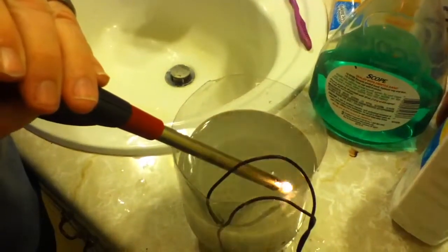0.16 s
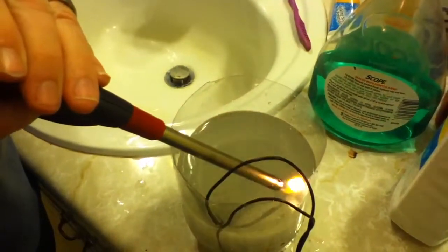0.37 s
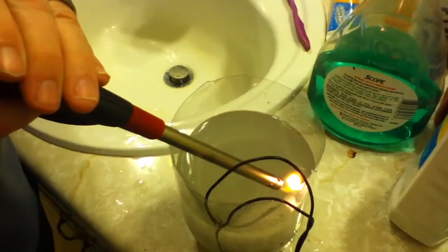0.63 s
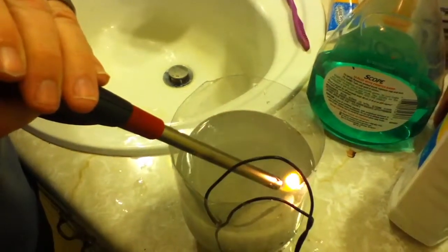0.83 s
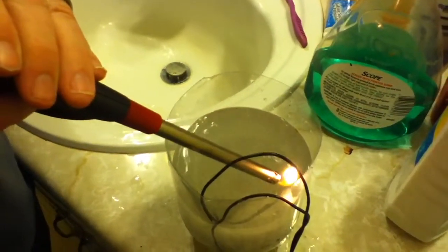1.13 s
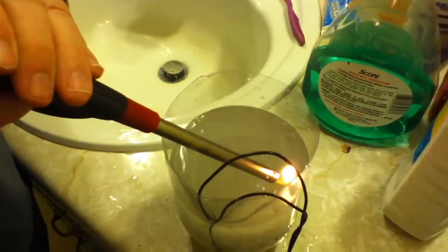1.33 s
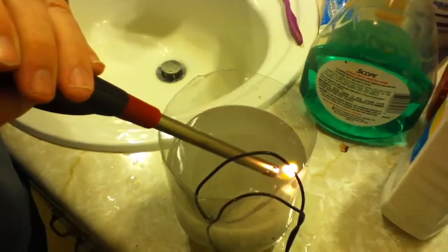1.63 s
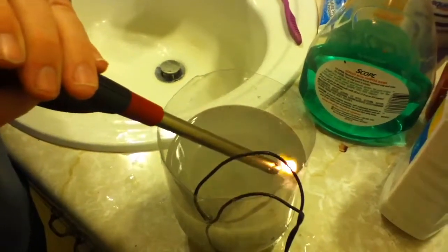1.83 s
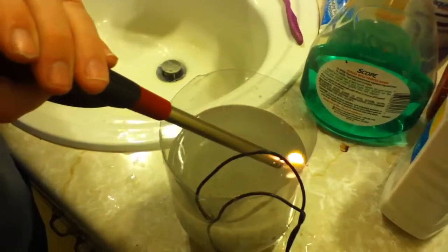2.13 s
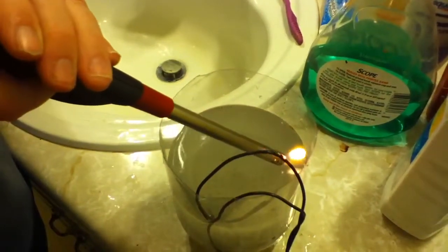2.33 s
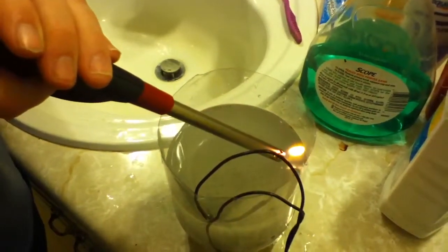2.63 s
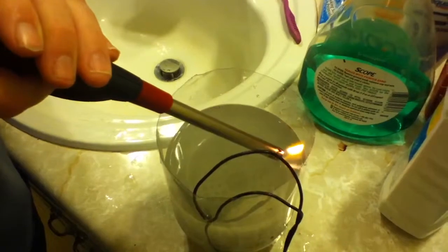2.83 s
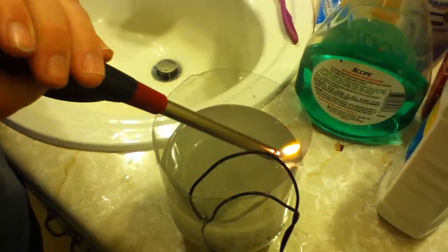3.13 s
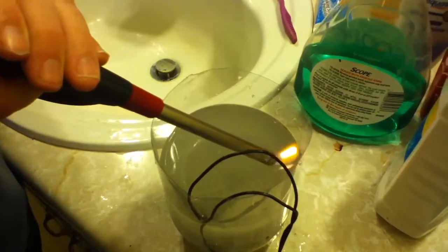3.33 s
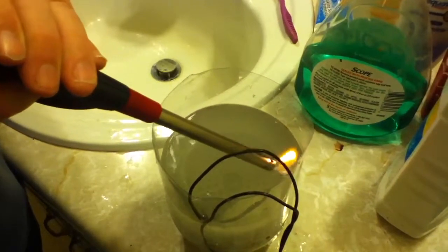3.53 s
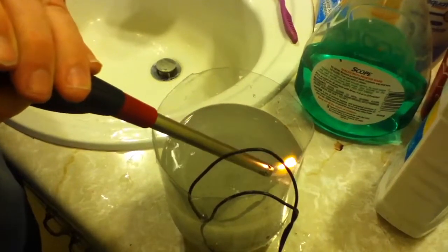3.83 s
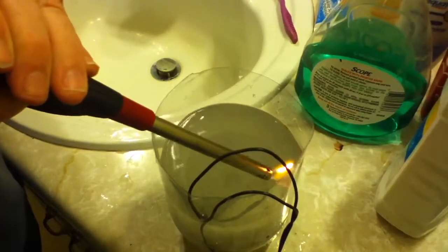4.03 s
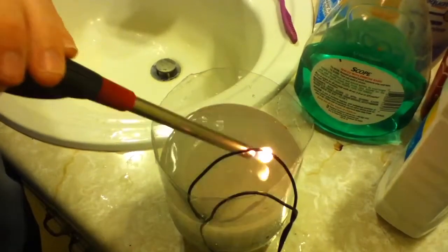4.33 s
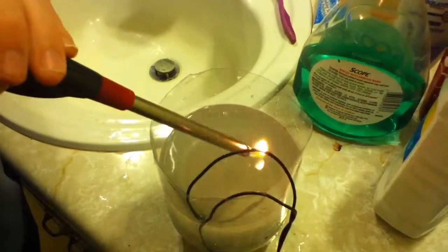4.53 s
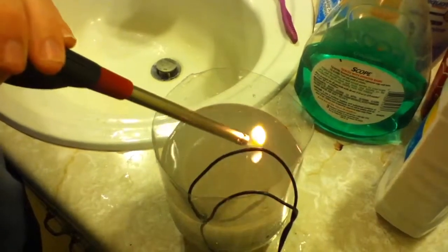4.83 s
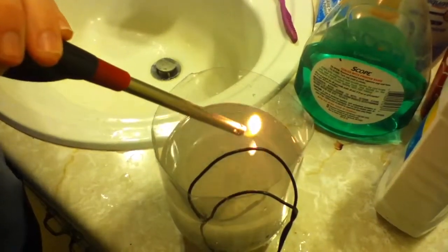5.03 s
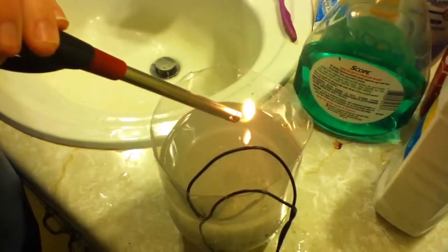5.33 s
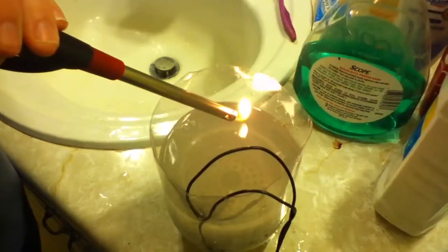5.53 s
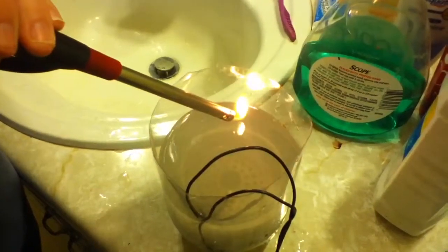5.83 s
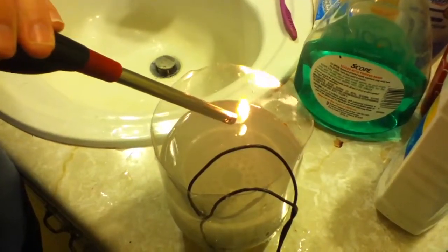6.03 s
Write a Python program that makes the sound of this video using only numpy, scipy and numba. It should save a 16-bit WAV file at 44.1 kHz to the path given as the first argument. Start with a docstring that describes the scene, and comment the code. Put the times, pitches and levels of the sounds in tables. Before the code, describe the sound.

Tiny bubbles crackle quietly in a plastic container while sudden loud snaps of igniting gas ring hollowly and bounce around a small tiled room.

```python
"""A soft fizz over a low house hum is heard first, then sharp pops that ring and echo.
Hydrogen bubbles on water in a cut-off plastic bottle burn under a lighter flame in a tiled bathroom. Each
flash is a short pressure pulse that excites the bottle's air modes, scatters in foam and echoes off the
tiles. The fizz is gliding decaying sines; dry ticks are band-filtered noise bursts with a dull knock.
The phone's gain control ducks after loud pops, a limiter holds the peaks, and bass and top are cut."""
import sys
import numpy as np
from scipy import signal
from scipy.fft import rfft, irfft
from scipy.io import wavfile
from scipy.ndimage import uniform_filter1d, minimum_filter1d
from numba import njit

SR = 44100
rng = np.random.default_rng(int(sys.argv[2]) if len(sys.argv) > 2 else 0)


def unload_audio(sound):
    """Save the sound as a 16-bit wav file, at the path given as the first command line argument."""
    columns = np.transpose(np.atleast_2d(sound))
    # keep every value between -1 and 1, then stretch to whole-number steps
    steps = np.round(np.clip(columns, -1, 1) * 32767)
    wavfile.write(sys.argv[1], SR, steps.astype(np.int16))


N = 272263

# hiss and house rumble, relative spectrum: pitch_hz, density_db (per Hz)
HUM_SPECTRUM = [(15, -43), (25, -7), (82, -1), (161, -2.5), (263, -4), (384, -8.5), (463, -9.5), (560, -12),
                (911, -15.5), (2280, -18), (3820, -19.5), (8590, -20), (14800, -24), (16000, -30.5)]
# swell of the rumble: time_s, gain_db
RUMBLE_SWELL = [(0, -2), (.7, -3.5), (1.5, 1.5), (2.3, 0), (3.1, 0.5), (4, 2.5), (4.8, -0.5), (5.5, -1),
                (6.2, 0.5)]
HUM_RMS_DB, RUMBLE_TOP_HZ = -57.5, 500
# far motor, one entry per partial: multiple of the turn rate; rms_db
MOTOR_MULTIPLES = 1, 2, 3, 4, 6, 9
MOTOR_RMS_DB = -71.5, -76, -71, -74.5, -74, -75.5
MOTOR_TURNS_HZ = 29.8

# fizz at the surface, central level over time: time_s, level_db
FIZZ_LEVEL = [(0, -54), (.8, -78.5), (1.3, -55.5), (2, -71), (3, -62), (3.9, -59), (4.6, -71), (5.7, -63),
              (6.2, -69)]
# bubbles that stand out of the fizz: start_s, level_db, starting pitch_hz
LOUD_BUBBLES = [(0.731, -46.5, 4930), (0.768, -49, 7220), (0.823, -47, 7740), (0.914, -46, 9400),
                (0.976, -45, 7150), (1.035, -51, 8000), (1.055, -49, 6200), (1.12, -44.5, 8480),
                (1.2156, -45, 9570), (1.283, -49, 9600), (1.2915, -44.5, 5700), (1.465, -51, 7900),
                (1.49, -44, 5390), (1.555, -53, 6600), (2.577, -50, 6900), (3.001, -53, 6540),
                (3.033, -44, 7450), (3.053, -49, 7950), (3.0784, -44.5, 8140), (3.722, -51, 9200),
                (3.848, -53, 8800), (3.88, -51, 9200), (3.887, -54, 4500), (3.945, -49, 9700),
                (3.957, -48, 9300), (4.0023, -47, 8650), (4.2244, -54, 4560), (4.654, -41.5, 8970),
                (5.6294, -55.5, 5880), (5.6474, -45, 6550), (5.684, -48, 7280), (5.696, -49.5, 7420)]
FIZZ_PER_S, FIZZ_HZ, FIZZ_RANGE_OCTAVES, FIZZ_SPREAD_DB = 170, 8300, 1.2, 5
FIZZ_T60_CYCLES, LOUD_BUBBLE_T60_MS = 60, 8.9  # cycles of the starting pitch
BUBBLE_GLIDE = 0.2  # share of extra phase reached at t60

# tiled room, echo bands: centre_hz, t60_s, level_db
ROOM_BANDS = [(69.7, .4, -38.5), (126.6, .4, -34), (200, 0.24, -36), (408, 0.71, -36), (760, 0.43, -30.5),
              (1088, 0.58, -32), (1700, 0.41, -30), (2220, 0.5, -30), (2990, 0.46, -36.5),
              (4240, 0.48, -35.5), (5400, 0.5, -36.5), (7500, 0.39, -34), (10000, 0.33, -34),
              (12500, 0.27, -38), (15300, 0.27, -44)]
# lowest standing wave of the room: pitch_hz, level_db, t60_s
ROOM_STANDING_WAVE = [(137, -51.5, 0.8)]
ROOM_GAP_S, ROOM_RISE_S = 0.0032, 0.004
SMALL_TO_ROOM_DB = -7.0  # ticks and fizz, as sent to the walls

# flashes of gas: bang_s, peak_db (clean ring), suction_ms (before the bang), bang_width_ms,
# suction_share (0-1, area of the bang), cross_ring_db, room_db
FLASHES = [(0.157, -33, 0.49, 0.5, 0.9, -12, -10), (.24865, 4, 2.1, 0.17, 0.5, -1.5, -7.5),
           (.2495, 0.5, 0.13, 0.097, 0.53, 5, 3.5), (1.015, -46, 0.86, 0.41, 0.88, -9, -10),
           (1.6033, -9.5, 0.14, 0.075, 0.39, 0, -4), (1.9720, 3.5, 0.81, 0.13, 0.53, -3, -4),
           (2.0872, -13, 0.11, 0.045, 0.54, -5.5, -7), (2.1122, -36, 0.32, 0.8, 0.52, -0.5, -5),
           (2.3725, -18.5, 0.52, 0.18, 0.23, 1, -6.5), (4.0313, -22.5, 0.57, 0.092, 0.96, 0.5, -8),
           (4.0854, -11, 0.33, 0.12, 0.94, -5, -9), (4.1079, -15.5, 0.25, 0.075, 0.05, -2, 0.5),
           (4.131, -33.5, .55, 0.54, .5, -4.5, -4), (4.3132, -12.5, 0.34, 0.059, 0, -0.5, -4.5),
           (4.3218, 3, 0.21, 0.11, 0.75, -2.1, -2)]
# air in the bottle along its depth: pitch_hz, level_db, t60_s
DEPTH_MODES = [(987, -7, 0.026), (1215, -6, 0.018), (1480, -16.5, 0.013), (3530, -1.5, 0.027),
               (3780, -19.5, .03), (4560, -17, .015), (6890, -18, 0.034), (7400, -21, .025),
               (8240, -21.5, .025), (9000, -16.5, 0.03), (10500, -16.5, 0.01), (12500, -21, .01)]
# air in the bottle crosswise: pitch_hz, level_db, t60_s
CROSS_MODES = [(2337, -13, 0.048), (2546, -5, 0.026), (5790, -10, 0.045)]
DIRECT_DB = 3
SIDEWAYS_T60_S = 0.0095  # extra decay of the ring through the wall
CRACKLE_DB, CRACKLE_T60_S, ROOM_CRACKLE_DB, FOAM_TOP_HZ = -11, 0.053, 0.5, 10900
CRACKLE_GROWTH = 0.2  # bigger flashes tear more foam: extra dB of crackle per dB of peak

# dry ticks: start_s, peak_db (rattle), t60_ms, brightness_db_per_octave, knock_db (relative to the rattle)
DRY_TICKS = [(2.2205, -42, 13, 14, -40), (2.62, -42.5, 8, 17, -40), (3.548, -46, 11, -11.5, -42.5),
             (3.6603, -34, 9.2, -3.5, -5.5), (3.6912, -38, 6.8, -8, -0.5), (3.721, -51, 14, -11, -3),
             (4.0967, -49.5, 12, 5, -47.5), (5.71, -42.5, 8, 13.5, -40), (6.005, -30.5, 28, -5, -36)]
# wide resonances of a tick: centre_hz, gain_db
TICK_RESONANCES = [(3400, -2.5), (5500, -0.2), (8100, -0.1), (10500, -6.5), (13000, -14.5)]
TICK_BANDWIDTH = 0.23  # share of the centre pitch
KNOCK_BAND_HZ, KNOCK_TILT_HZ, KNOCK_T60_S, KNOCK_RISE_S = (700, 2500), 900, 0.035, 0.0018

DUCK_FROM_DB, DUCK_SHARE = -40, 0.57  # cut in dB per dB above the threshold
DETECT_S, ATTACK_S, RELEASE_S = 0.0033, 0.015, 0.9
LIMIT_DB, LIMIT_S = -3.2, 0.006
MIC_LOW_HZ, TOP_HZ = 60.6, 15900


def undb(db):
    """Decibel law: amplitude gain from a level in dB."""
    return 10 ** (np.asarray(db) / 20)


def fade(t, t60):
    """Exponential damping, 60 dB down at t60."""
    return np.exp(-np.log(1000) * t / t60)


def filtered(x, order, hz, kind="low"):
    """Butterworth response: maximally flat passband."""
    return signal.sosfilt(signal.butter(order, hz, kind, fs=SR, output="sos"), x)


def convolve(x, response):
    """Superposition of impulse responses, cut to the scene length."""
    return signal.fftconvolve(x, response)[:N]


def add(out, s, sound):
    """Superposition: mix a short sound in at s seconds."""
    i = int(round(s * SR))
    out[i:i + len(sound)] += sound[:N - i]


def ring(modes, length_s=0.1):
    """Modal superposition: damped modes all start at their crest when a pulse hits the air."""
    t = np.arange(int(SR * length_s)) / SR
    return sum(undb(db) * np.cos(2 * np.pi * hz * t) * fade(t, t60) for hz, db, t60 in modes)


def coloured(noise, hz, db):
    """Spectral shaping: weight noise by a curve on a log-frequency axis."""
    f = np.maximum(np.fft.rfftfreq(len(noise), 1 / SR), 1)
    gain = undb(np.interp(np.log(f), np.log(hz), db))
    return irfft(rfft(noise) * gain, len(noise))


def hum():
    """Stationary noise: steady microphone hiss over a house rumble whose level swells slowly."""
    noise = coloured(rng.standard_normal(N), *np.transpose(HUM_SPECTRUM))
    rumble = filtered(noise, 2, RUMBLE_TOP_HZ)
    swell = undb(np.interp(np.arange(N) / SR, *np.transpose(RUMBLE_SWELL)))
    swelling = noise + rumble * (swell - 1)
    return swelling * undb(HUM_RMS_DB) / np.std(swelling)


def motor():
    """Periodic rotation: a far motor hums faintly at multiples of its turn rate."""
    t, out = np.arange(N) / SR, 0
    for k, db in zip(MOTOR_MULTIPLES, MOTOR_RMS_DB):
        partial = np.sin(2 * np.pi * k * MOTOR_TURNS_HZ * t + k ** 2)
        out = out + undb(db) * np.sqrt(2) * partial
    return out


def fizz():
    """Bubble resonance: bursting bubbles sound as short sines that glide up as the neck opens."""
    out, t = np.zeros(N), np.arange(SR // 20) / SR
    when, size, pitch = rng.random((int(FIZZ_PER_S * N / SR), 3)).T
    when = when * N / SR
    small_hz = FIZZ_HZ * 2 ** (FIZZ_RANGE_OCTAVES * (pitch - 0.5))
    small_db = np.interp(when, *np.transpose(FIZZ_LEVEL)) + FIZZ_SPREAD_DB * (2 * size ** 2 - 1)
    bubbles = list(zip(when, small_db, small_hz, 1000 * FIZZ_T60_CYCLES / small_hz))
    bubbles += [(*row, LOUD_BUBBLE_T60_MS) for row in LOUD_BUBBLES]
    for s, db, hz, t60_ms in bubbles:
        age = 1000 * t / t60_ms  # 1 at t60
        phase = 2 * np.pi * hz * t * (1 + BUBBLE_GLIDE * np.minimum(age, 1))
        envelope = fade(age, 1) * np.minimum(age / 0.05, 1)
        add(out, s, undb(db) * np.sin(phase) * envelope)
    return out


def room():
    """Reverberation: dense echoes begin after the first wall trip, each band with its own decay."""
    t, out = np.arange(SR) / SR, 0
    log_hz = np.log(np.array(ROOM_BANDS)[:, 0])
    spectrum = rfft(rng.standard_normal(SR))
    log_bins = np.log(np.arange(len(spectrum)) + 1)
    for k, (_, t60, db) in enumerate(ROOM_BANDS):
        # neighbouring bands crossfade on the log-frequency axis
        share = np.interp(log_bins, log_hz, np.arange(len(log_hz)) == k)
        out = out + undb(db) * irfft(spectrum * share) * fade(t, t60)
    onset = np.clip((t - ROOM_GAP_S) / ROOM_RISE_S, 0, 1)
    return (out + ring(ROOM_STANDING_WAVE, 1)) * onset


def flash_pulse(t_ms, dip_ms, bang_ms, suction):
    """Pressure pulse of a flash: a suction dip, then a sharp bang; return both pulse and bang."""
    bang = np.exp(-np.abs(t_ms / (0.5 * bang_ms)) ** 1.34)
    dip = np.sin(np.pi * np.clip((-t_ms - 0.5 * bang_ms) / dip_ms, 0, 1)) ** 2
    return bang - suction * dip * bang.sum() / dip.sum(), bang


def pops():
    """Impulse excitation: flashes drive bottle modes and foam; return near sound and what the walls get."""
    near, far = np.zeros(N), np.zeros(N)
    t_ms = np.arange(-SR // 200, SR // 200) / SR * 1000
    depth, cross = ring(DEPTH_MODES), ring(CROSS_MODES)
    ring_t = np.arange(len(depth)) / SR
    foam = rng.standard_normal((len(FLASHES), len(depth))) * fade(ring_t, CRACKLE_T60_S)
    foam = filtered(foam, 2, FOAM_TOP_HZ)
    for (s, db, dip_ms, bang_ms, suction, cross_db, room_db), scatter in zip(FLASHES, foam):
        pulse, bang = flash_pulse(t_ms, dip_ms, bang_ms, suction)
        bottle = depth + undb(cross_db) * cross
        bottle[0] += undb(DIRECT_DB)  # direct sound
        clean = signal.fftconvolve(pulse, bottle)
        # through the thin wall the ring reaches the room more damped
        sideways = signal.fftconvolve(pulse, bottle * fade(ring_t, SIDEWAYS_T60_S))
        # foam scatters the slope of the pulse
        scattered = signal.fftconvolve(np.diff(pulse, prepend=0), scatter) * bang.sum()
        crackle = undb(CRACKLE_DB + CRACKLE_GROWTH * db) * scattered
        to_room = sideways + undb(ROOM_CRACKLE_DB) * crackle
        start = s - 1 / 200  # the bang is centred in its window
        add(near, start, undb(db) * (clean + crackle) / clean.max())
        add(far, start, undb(db + room_db) * to_room / clean.max())
    return near, far


def ticks():
    """Noise-excited resonance: a decaying rattle in a few wide bands, with a dull knock under it."""
    out, t = np.zeros(N), np.arange(SR // 20) / SR
    centres_hz, ring_db = np.transpose(TICK_RESONANCES)
    edges = np.exp([-TICK_BANDWIDTH / 2, TICK_BANDWIDTH / 2])
    octaves = np.log2(centres_hz / centres_hz[0])
    noises = rng.standard_normal((len(DRY_TICKS), 2, len(t)))
    for (s, db, t60_ms, bright_db, knock_db), (hiss, low) in zip(DRY_TICKS, noises):
        gains = undb(ring_db + bright_db * octaves)
        burst = hiss * fade(t, t60_ms / 1000)
        rattle = sum(g * filtered(burst, 2, hz * edges, "band") for g, hz in zip(gains, centres_hz))
        thud = low * fade(t, KNOCK_T60_S) * np.minimum(t / KNOCK_RISE_S, 1)
        knock = filtered(filtered(thud, 2, KNOCK_BAND_HZ, "band"), 1, KNOCK_TILT_HZ)
        rattle = rattle / np.abs(rattle).max()
        knock = undb(knock_db) * knock / np.abs(knock).max()
        add(out, s, undb(db) * (rattle + knock))
    return out


def scene():
    """Linear superposition of close sources, their echo and the background."""
    near, far = pops()
    small = ticks() + fizz()
    echo = convolve(far + undb(SMALL_TO_ROOM_DB) * small, room())
    return (near + small + echo + hum() + motor())[None]


@njit
def duck(want_db, attack, release):
    """First-order smoothing: the cut deepens quickly and recovers slowly."""
    out, g = np.empty(len(want_db)), 0.
    for i in range(len(want_db)):
        g += (want_db[i] - g) * (attack if want_db[i] > g else release)
        out[i] = g
    return out


def record(dry):
    """Dynamic compression by short-time level, then bass cut, peak limiting and a steep top cut."""
    k = 1 / (DETECT_S * SR)
    power = signal.lfilter([k], [1, k - 1], dry[0] ** 2)
    level_db = 10 * np.log10(power + 1e-12)
    want_db = DUCK_SHARE * np.maximum(level_db - DUCK_FROM_DB, 0)
    cut_db = duck(want_db, 1 / (ATTACK_S * SR), 1 / (RELEASE_S * SR))
    wet = filtered(dry * undb(-cut_db), 2, MIC_LOW_HZ, "high")
    # the limiter holds its lowest gain around each peak, then smooths it
    span = int(LIMIT_S * SR)
    peak_gain = np.minimum(undb(LIMIT_DB) / (np.abs(wet) + 1e-9), 1)
    hold = minimum_filter1d(peak_gain, 2 * span)
    limited = wet * uniform_filter1d(hold, span)
    return signal.sosfilt(signal.ellip(10, 0.2, 70, TOP_HZ, fs=SR, output="sos"), limited)


dry = scene()
out = record(dry)
unload_audio(out)
```